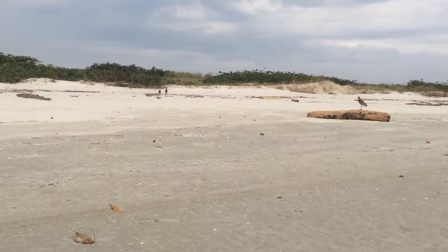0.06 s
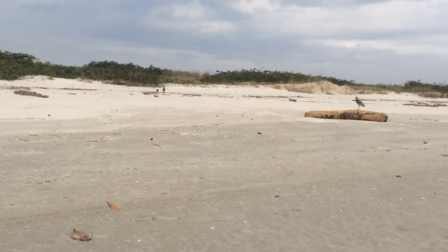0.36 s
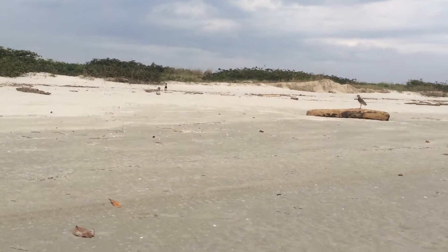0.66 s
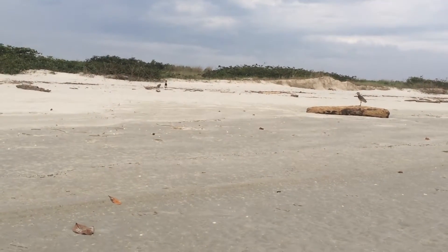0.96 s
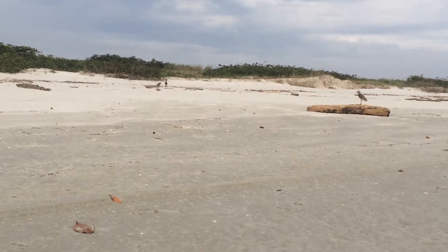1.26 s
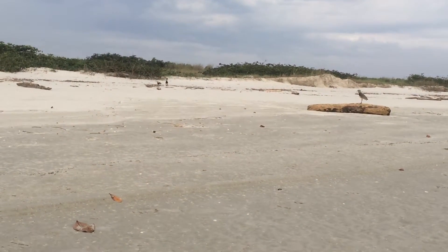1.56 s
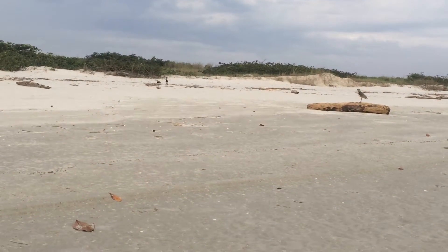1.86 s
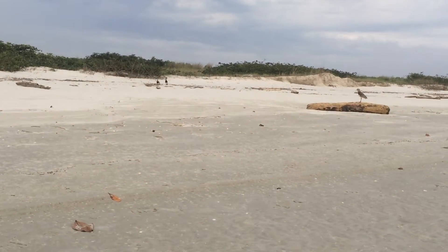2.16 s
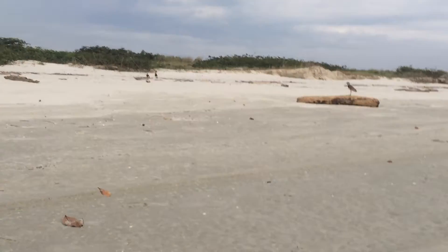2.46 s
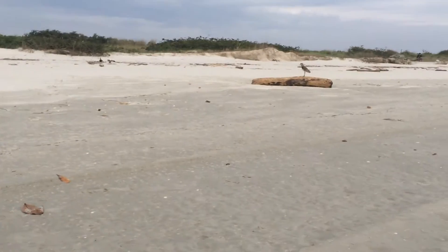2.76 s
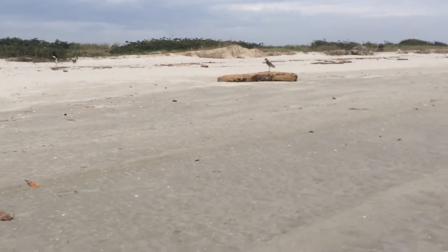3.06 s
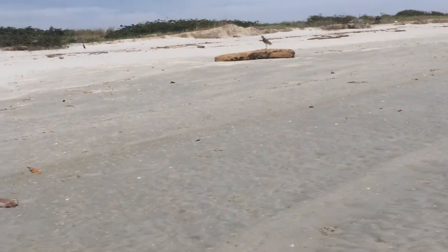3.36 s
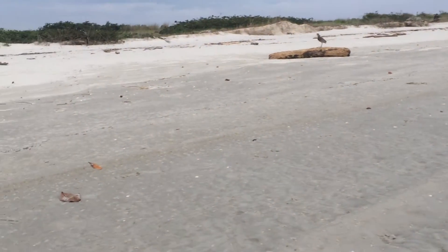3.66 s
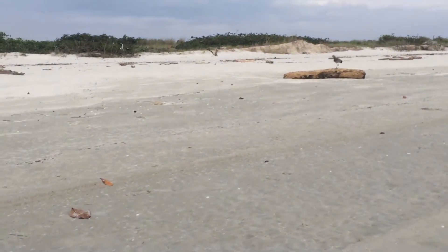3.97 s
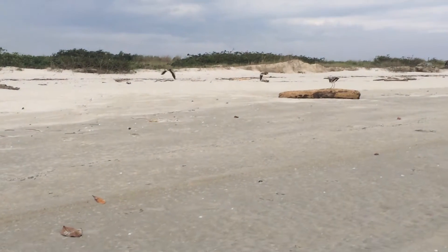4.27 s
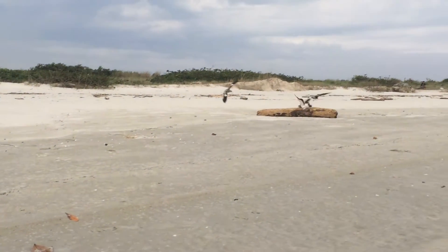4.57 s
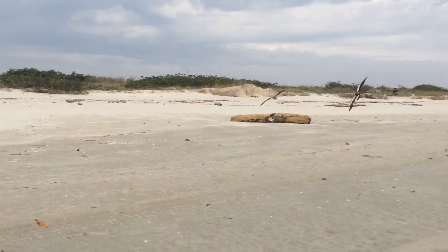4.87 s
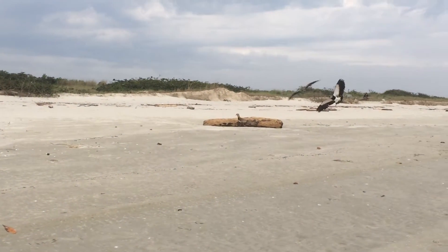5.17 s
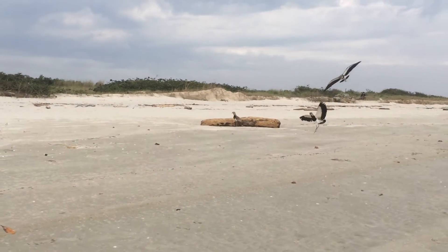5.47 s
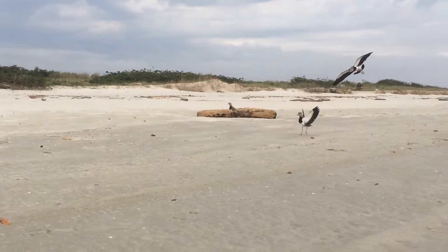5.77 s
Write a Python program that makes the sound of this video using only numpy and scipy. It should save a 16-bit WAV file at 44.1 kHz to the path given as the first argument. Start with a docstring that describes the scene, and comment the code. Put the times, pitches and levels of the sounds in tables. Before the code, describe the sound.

Steady surf and a light breeze on the microphone lie under the scolding of shorebirds on a beach. A quick run of thin, shrill calls trails off, then fuller, rattling calls follow at an even pace and grow louder, sometimes two at once. The birds drop to a few faint yelps, and a short burst of lower, harsh rasps comes from close by at the end.

```python
"""An open beach, where lapwings scold in arched, reedy calls, two birds at times overlapping.
Each call is a stack of harmonics coloured by the throat; many open with a rattle, made by a flutter
of the voice box. At the end one bird swoops close with low, harsh rasps. Surf rumbles and washes
steadily, and light wind brushes a mono microphone with gusts of low noise and small puffs."""
import sys
import numpy as np
from scipy import signal
from scipy.fft import rfft, irfft, next_fast_len
from scipy.io import wavfile
from scipy.ndimage import uniform_filter1d, map_coordinates

SR = 44100
rng = np.random.default_rng(int(sys.argv[2]) if len(sys.argv) > 2 else 0)


def wav_record(signal):
    """Record a signal, one row per channel, as 16-bit PCM in the file named by sys.argv[1]."""
    frames = np.transpose(np.atleast_2d(signal))
    bounded = np.clip(frames, -1, 1)
    # unit amplitude maps onto the largest positive 16-bit level
    quanta = np.round(bounded * 32767).astype(np.int16)
    wavfile.write(sys.argv[1], SR, quanta)


N = 256662

# How strong the surf is. Each row: time in seconds, rumble level in dB, wash level in dB.
SURF_LEVELS = [(0.0, -59, -51), (0.16, -53, -51), (1.39, -50.5, -51.5), (1.62, -49, -50), (5.4, -48, -50.5),
               (5.82, -51.5, -49.5)]
# The tone colours of breakers, foam and wind. Each row: frequency in Hz, relative level in dB.
RUMBLE_COLOUR = [(60, -39), (120, -4), (175, -1), (260, -5), (380, -9.5), (700, -30.5), (2000, -77)]
WASH_COLOUR = [(150, -3.5), (420, 0), (900, -0.5), (1500, -4), (2400, -10), (3600, -12), (5000, -19),
               (7000, -24.5), (10000, -32.5), (13000, -39), (15500, -57)]
WIND_COLOUR = [(20, -20), (40, -5), (68, 8), (100, 6), (140, -10), (300, -42.5)]
# Gusts on top of the breeze. Each row: time of the peak in seconds, width in seconds, lift in dB.
WIND_GUSTS = [(1.3, .3, 3), (2.75, 0.16, 2), (3.93, 0.13, 10), (4.3, 0.24, 0), (5.65, 0.11, 4.5)]
# The calls: each scoops up to a crest, then sags. Each row: start in seconds, voice, rise and fall
# lengths in seconds, start, crest and end pitches in Hz, bend (1 sags evenly, higher drops late),
# level in dB, rattle length in seconds, treble tilt in dB per octave.
LAPWING_CALLS = [ (.119, "shrill", 0.057, 0.043, 1062, 1144, 1080, 1.64, -31, 0.088, 1.5),
                 (.165, "shrill", 0.065, 0.052, 1163, 1244, 1090, 3, -31.5, 0.068, 0.5),
                 (.428, "shrill", 0.027, 0.035, 1002, 1158, 993, 1.8, -37.5, 0.02, -1),
                 (.575, "shrill", 0.035, 0.053, 990, 1221, 1076, 2.7, -32, 0.018, 2),
                 (.701, "shrill", 0.024, 0.029, 960, 1137, 1010, 1.75, -40.5, 0.0078, -1),
                 (.913, "shrill", .028, 0.037, 978, 1152, 1012, 1.5, -34.5, 0.011, 0.5),
                 (.965, "shrill", 0.02, 0.017, 1030, 1057, 934, 1.7, -46, .005, -6.5),
                 (1.254, "shrill", 0.021, 0.024, 900, 1030, 964, 1.5, -45.5, 0, -10),
                 (1.278, "shrill", 0.018, 0.031, 1010, 1105, 950, 0.91, -41.5, 0.0019, -3),
                 (1.907, "round", 0.027, 0.1, 970, 1070, 923, 0.81, -30, 0.0072, -1.5),
                 (2.287, "round", 0.049, 0.094, 1006, 1139, 964, 1.4, -25.5, .06, -1.7),
                 (2.665, "round", 0.055, 0.088, 980, 1152, 977, 1.62, -25, 0.065, -1),
                 (2.935, "shrill", 0.084, 0.06, 1137, 1094, 990, 1.22, -33, 0.0087, -1.5),
                 (3.027, "round", 0.028, 0.096, 1042, 1141, 940, 1.64, -24, .034, 0),
                 (3.276, "loud", .036, .108, 1080, 1149, 1105, 6.8, -26.5, 0.065, .9),
                 (3.295, "loud", 0.024, 0.092, 1125, 1168, 1070, 3, -26, .025, 1),
                 (3.604, "loud", 0.043, 0.1, 1123, 1204, 1031, 0.56, -20, 0.052, -0.5),
                 (3.618, "loud", 0.04, .06, 1060, 1176, 1110, 1.45, -27.5, 0.026, 5.5),
                 (3.941, "loud", 0.024, .056, 1080, 1168, 1104, 1.6, -23.5, 0.017, -2),
                 (5.517, "rasp", 0.017, 0.034, 894, 910, 840, 0.88, -34.5, .035, 0),
                 (5.597, "rasp", .006, .006, 870, 897, 860, 2, -43, 0.023, 1.5),
                 (5.661, "rasp", 0.035, 0.032, 883, 906, 815, 1.2, -30.5, 0.048, 1.5),
                 (5.796, "rasp", 0.025, .03, 894, 920, 830, 1.5, -27.5, .05, 2.8)]
# The throat colours of the voices. Each row: frequency in Hz, relative level in dB.
SHRILL_THROAT = [(1150, -15.5), (2300, -10.5), (3450, -7), (4600, -6.5), (5900, -3), (6900, -5),
                 (8000, -11.5), (9200, -4.5), (10500, -4), (11600, -11), (13000, -14), (15000, -26)]
ROUND_THROAT = [(1130, -24), (2260, -8.5), (3400, -4), (4500, 0.5), (5650, -8.5), (6800, -8), (7900, -16),
                (9000, -21.5), (11000, -21), (13000, -21), (15500, -36)]
LOUD_THROAT = [(1150, -25), (2300, -14.5), (3450, -1.5), (4600, -2.5), (5800, -1), (6900, -8),
               (8100, -24.5), (9200, -12.5), (10400, -10), (12500, -15), (15000, -35)]
RASPY_THROAT = [(900, -21), (1800, -1.5), (2700, 2), (3600, -14), (4500, -11), (6200, -28), (7100, -16.5),
                (8100, -42), (9000, -21.5), (12000, -19.5), (15500, -33)]
# Puffs of wind on the microphone. Each row: time in seconds, peak level in dB.
WIND_PUFFS = [(.45, -39.5), (.682, -38), (1.193, -39.5), (3.875, -38.5), (5.559, -34.5)]
# Short, faint yelps. Each row: start in seconds, length in seconds, level in dB.
FAINT_YELPS = [(1.62, 0.029, -69), (4.757, 0.035, -61), (5.135, 0.04, -57.5), (5.321, 0.061, -52.5)]

SCOOP_POWER, SWELL_POWER = 2.806, 2  # the pitch reaches its crest sooner than the level
FAINT_FOOT_HZ, FAINT_CREST_HZ = 900, 1070
BREEZE_DB = -57.5
TOP_HZ = 15800


def amp(db):
    """Turn decibels into a gain."""
    return 10 ** (np.asarray(db) / 20)


def unit(x):
    """Scale a signal to an average strength (rms) of 1."""
    return x / np.sqrt(np.mean(x ** 2) + 1e-20)


def along(colour, hz):
    """Look up a tone colour's level in dB at any frequency."""
    freqs, levels = np.transpose(colour)
    return np.interp(np.log(hz + 1), np.log(freqs), levels)


def wobble(rate, t):
    """A smooth curve through `rate` random values a second."""
    place = (t - t[0]) * rate
    return map_coordinates(rng.standard_normal(int(place[-1]) + 4), [place + 1], mode="nearest")


def filtered(x, response):
    """Scale each frequency in x by the gain response(hz)."""
    size = next_fast_len(len(x) + SR // 4)
    return irfft(rfft(x, size) * response(np.fft.rfftfreq(size, 1 / SR)), size)[:len(x)]


def rush(colour, patchy_db):
    """Rushing noise with drifting louder and softer patches."""
    spectra = signal.stft(rng.standard_normal(N), nperseg=1024)[2]
    patches = uniform_filter1d(rng.standard_normal(spectra.shape), size=9, axis=0)  # across frequency
    patches = uniform_filter1d(patches, size=10, axis=1)  # across time
    noise = signal.istft(spectra * amp(patchy_db * unit(patches)), nperseg=1024)[1][:N]
    return unit(filtered(noise, lambda hz: amp(along(colour, hz))))


def surf():
    """Breakers rumble and foam washes up the sand."""
    t = np.arange(N) / SR
    times, rumble_db, wash_db = np.transpose(SURF_LEVELS)
    rumble_gain = amp(np.interp(t, times, rumble_db) + 0.46 * wobble(12, t))
    rumble = rumble_gain * rush(RUMBLE_COLOUR, patchy_db=1.5)
    wash = amp(np.interp(t, times, wash_db)) * rush(WASH_COLOUR, patchy_db=1.3)
    return rumble + wash


def wind():
    """A breeze buffets the microphone, harder in the gusts."""
    t = np.arange(N) / SR
    gust_db = sum(lift_db * np.exp(-((t - peak) / width) ** 2) for peak, width, lift_db in WIND_GUSTS)
    return amp(BREEZE_DB + gust_db + 1.4 * wobble(16, t)) * rush(WIND_COLOUR, patchy_db=0.5)


def arch(call, swell_db, fade_db, crack, crack_db, tail_s, tail_slide, tail_db):
    """One call's pitch and level: it swells, fades by fade_db per octave of sag, then cracks lower."""
    start, _, rise, fall, start_hz, crest_hz, end_hz, bend, level_db, rattle_s, tilt_db = call
    index = np.arange(int(start * SR), int((start + rise + fall + tail_s) * SR))
    age = index / SR - start
    rise_left = np.clip(1 - age / rise, 0, 1)
    falling = np.clip((age - rise) / fall, 0, 1)
    cracked = np.clip((age - rise - fall) / 0.00635, 0, 1)
    dying = np.clip((age - rise - fall) / tail_s, 0, 1)
    scoop_hz = crest_hz + (start_hz - crest_hz) * rise_left ** SCOOP_POWER
    sag = 1 + (end_hz / crest_hz - 1) * falling ** bend
    hz = scoop_hz * sag * (1 - crack * cracked - tail_slide * dying)
    db = level_db - swell_db * rise_left ** SWELL_POWER + fade_db * np.log2(sag)
    db -= crack_db * cracked + tail_db * dying
    return index, hz, db, start + rattle_s, tilt_db


def arches(voice, **manner):
    """All the calls of one voice, shaped in its own manner."""
    return [arch(call, **manner) for call in LAPWING_CALLS if call[1] == voice]


def ring_phase(throat, hz):
    """The phase shift of a throat that rings after each pulse (minimum phase)."""
    grid = np.abs(np.fft.fftfreq(SR // 20, 1 / SR))
    lag = -signal.hilbert(np.log(amp(along(throat, grid)))).imag
    return np.interp(hz, grid[:len(grid) // 2], lag[:len(grid) // 2])


def reed(pitch, effort_db, tilt_db, t, throat, rest_hz, follow, brighten, shimmer_db):
    """Harmonics through a throat that sinks with the pitch and can dull as the effort drops."""
    order = np.arange(1, 21)[:, None]
    throat_hz = order * pitch * (rest_hz / pitch) ** follow
    # the higher the harmonic, the less steady its strength
    shimmer = shimmer_db * np.minimum(order / 10, 1) * np.array([wobble(34.2, t) for _ in order])
    treble_db = (tilt_db + brighten * effort_db) * np.log2(np.clip(throat_hz / 3000, 1, 4))
    gain = amp(along(throat, throat_hz) + treble_db + shimmer) * (order * pitch < SR / 2)
    harmonics = gain * np.cos(2 * np.pi * order * np.cumsum(pitch) / SR + ring_phase(throat, throat_hz))
    return harmonics.sum(axis=0) / np.sqrt((gain ** 2).sum(axis=0) / 2)


def bird(calls, throat, depth, rattle_hz, swing, gap_db, rasp, hiss_db, jitter, fray, **timbre):
    """One voice: a flutter of the voice box (syrinx) chops tone and breath into rough bursts."""
    out = np.zeros(N + SR)
    for index, hz, db, rattle_end, tilt_db in calls:
        t = index / SR
        effort_db = db - db.max()
        rattle = depth * np.clip((rattle_end - t) / 0.0089, 0, 1)
        shut = np.cos(np.pi * (rattle_hz * (t - t[0]) + 0.025 * wobble(63, t))) ** 2
        # the voice is rough while it rattles, and frays where the effort fails
        rough = rattle + fray * np.clip(-effort_db / 20, 0, 1) ** 2
        waver = (jitter + 0.021 * rough) * wobble(900, t)
        pitch = hz * (1 + swing * rattle * (.25 - shut) + waver)  # each burst arches in pitch
        tone = reed(pitch, effort_db, tilt_db, t, throat, **timbre)
        tone *= amp(-gap_db * rattle * shut ** 3)
        noise = rng.standard_normal(len(t))
        breath = unit(filtered(noise, lambda f: amp(along(throat, f)) * f / (f + 5000)))
        breath *= (amp(hiss_db) + rasp * rough) * (1 - 0.81 * rattle * shut)
        edges = np.clip(np.minimum(t - t[0], t[-1] - t) / 0.00088, 0, 1)
        out[index] += amp(db) * edges * (tone + breath)
    return out[:N]


def lapwings():
    """A thin shrill voice, a rounder one, a full strident one, low rasps in flight, and faint yelps."""
    calls = arches("shrill", swell_db=15, fade_db=51, crack=.02, crack_db=2,
                   tail_s=.016, tail_slide=0.12, tail_db=13)
    shrill = bird(calls, SHRILL_THROAT, depth=.8, rattle_hz=107.8, swing=0.11, gap_db=12,
                  rasp=0.76, hiss_db=-25, jitter=0.0029, fray=0.43,
                  rest_hz=1130, follow=0.38, brighten=0.67, shimmer_db=6.5)
    calls = arches("round", swell_db=13, fade_db=40.5, crack=.2, crack_db=9,
                   tail_s=0.028, tail_slide=.12, tail_db=6.5)
    rounder = bird(calls, ROUND_THROAT, depth=0.865, rattle_hz=112, swing=0.125, gap_db=13.5,
                   rasp=0.425, hiss_db=-28, jitter=0.0018, fray=0.65,
                   rest_hz=1181, follow=0.48, brighten=0.029, shimmer_db=5.5)
    calls = arches("loud", swell_db=12, fade_db=56, crack=.07, crack_db=2.5,
                   tail_s=.044, tail_slide=0.1, tail_db=14.5)
    loud = bird(calls, LOUD_THROAT, depth=.23, rattle_hz=111, swing=0.099, gap_db=26,
                rasp=0.99, hiss_db=-34, jitter=0.0017, fray=0.45,
                rest_hz=1180, follow=0.54, brighten=0.25, shimmer_db=3.0)
    calls = arches("rasp", swell_db=19.5, fade_db=72, crack=0.022, crack_db=5,
                   tail_s=0.013, tail_slide=0.045, tail_db=9)
    rasps = bird(calls, RASPY_THROAT, depth=1.0, rattle_hz=76.2, swing=0.05, gap_db=53,
                 rasp=0.15, hiss_db=-18.5, jitter=0.018, fray=1,
                 rest_hz=920, follow=0.36, brighten=0, shimmer_db=5.5)
    calls = [faint_yelp(*row) for row in FAINT_YELPS]
    faint = bird(calls, RASPY_THROAT, depth=0.59, rattle_hz=113, swing=0.097, gap_db=19,
                 rasp=0.56, hiss_db=-12, jitter=.004, fray=.5,
                 rest_hz=950, follow=.5, brighten=0, shimmer_db=3)
    return shrill + rounder + loud + rasps + faint


def beach_echo(x, sand_db, sand_fade_s, dune_db, dune_fade_s, dune_build_s):
    """Rippled sand scatters the calls at once; the dunes answer later and very faintly."""
    t = np.arange(SR // 2) / SR
    sand = unit(rng.standard_normal(len(t)) * amp(-60 * t / sand_fade_s))
    build_up = np.minimum(t / dune_build_s, 1) ** 2
    dunes = unit(rng.standard_normal(len(t)) * amp(-60 * t / dune_fade_s) * build_up)
    tail = (amp(sand_db) * sand + amp(dune_db) * dunes) / np.sqrt(len(t))
    return x + signal.fftconvolve(x, tail)[:N]


def puffs(puff_hz, width_s):
    """Single swirls of air bump the microphone with a cycle or two of pressure."""
    t = np.arange(N) / SR
    out = np.zeros(N)
    for peak, db in WIND_PUFFS:
        detune, phase = rng.standard_normal(2)
        swell = np.exp(-((t - peak) / width_s) ** 2)
        out += amp(db) * swell * np.sin(2 * np.pi * (puff_hz * amp(detune) * (t - peak) + phase))
    return out


def faint_yelp(start, length, level_db):
    """A faint yelp is a plain, even arch that rattles throughout."""
    index = np.arange(int(start * SR), int((start + length) * SR))
    off_crest = np.linspace(-1, 1, len(index)) ** 2
    hz = FAINT_CREST_HZ + (FAINT_FOOT_HZ - FAINT_CREST_HZ) * off_crest
    return index, hz, level_db - 9 * off_crest, start + length, 0


def scene():
    """Birds over surf and wind, the same in both channels."""
    birds = beach_echo(lapwings(), sand_db=-12, sand_fade_s=0.093,
                       dune_db=-30.5, dune_fade_s=0.28, dune_build_s=.05)
    mono = birds + surf() + wind() + puffs(puff_hz=84.5, width_s=0.0083)
    return np.array([mono, mono])


def record(dry):
    """Cut away the highest treble, above TOP_HZ."""
    return np.array([filtered(channel, lambda hz: hz < TOP_HZ) for channel in dry])


dry = scene()
out = record(dry)
wav_record(out)
```